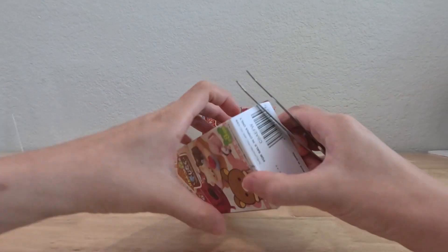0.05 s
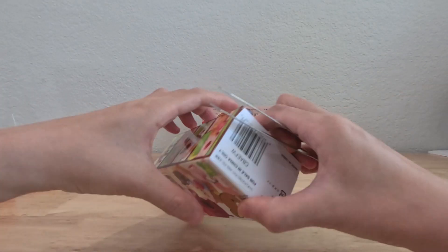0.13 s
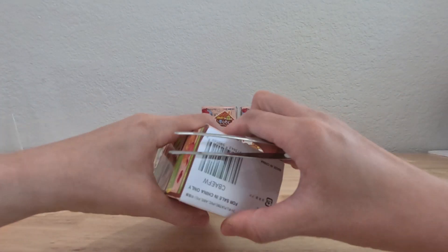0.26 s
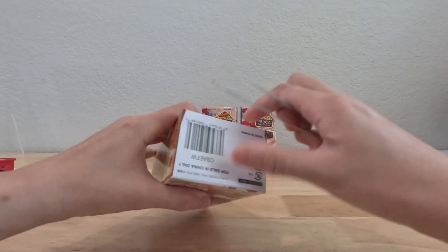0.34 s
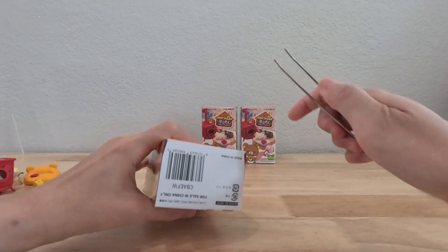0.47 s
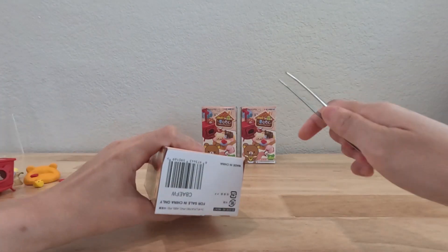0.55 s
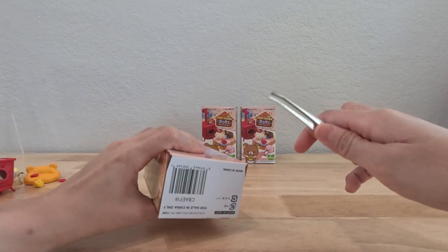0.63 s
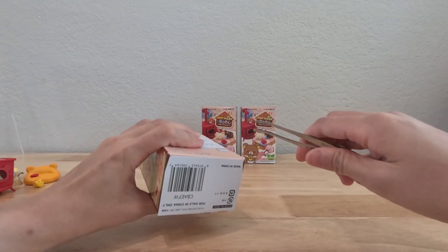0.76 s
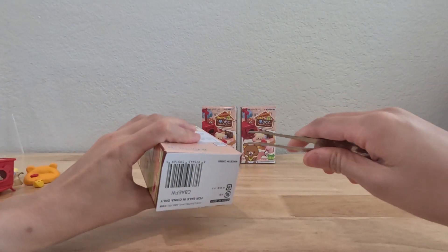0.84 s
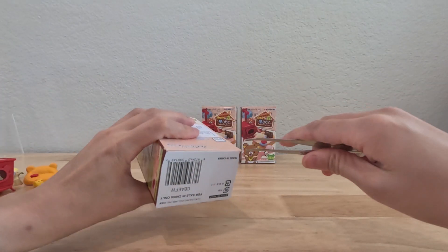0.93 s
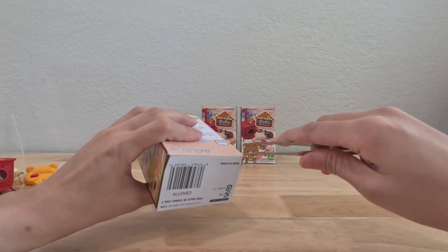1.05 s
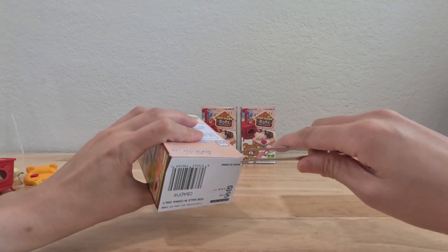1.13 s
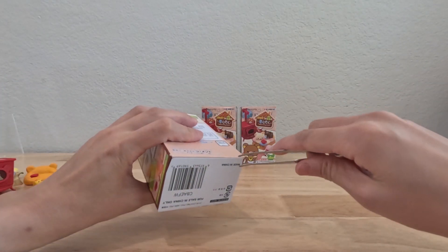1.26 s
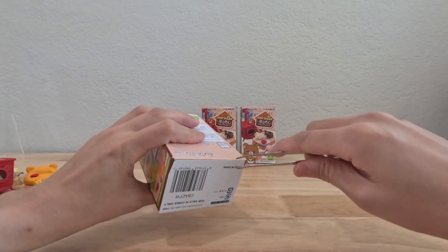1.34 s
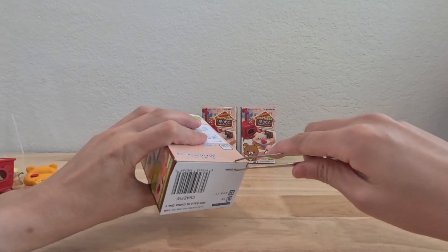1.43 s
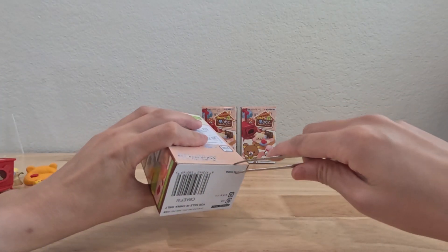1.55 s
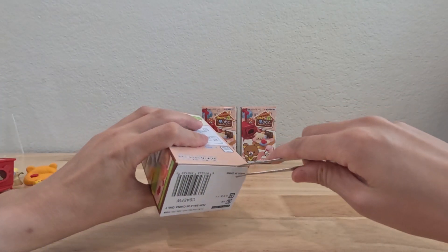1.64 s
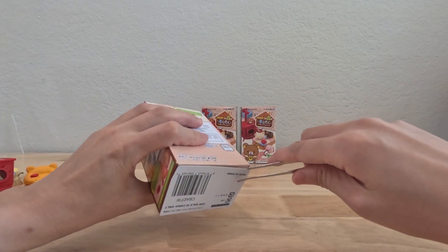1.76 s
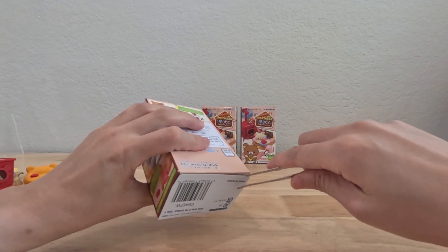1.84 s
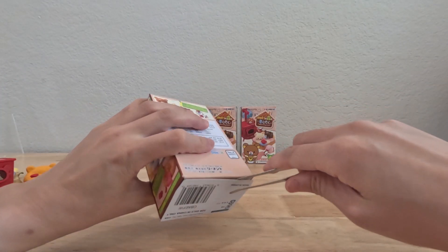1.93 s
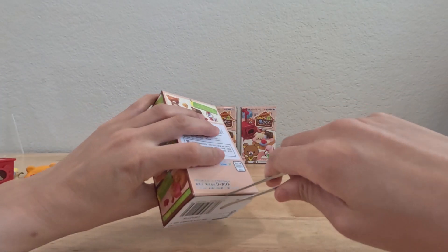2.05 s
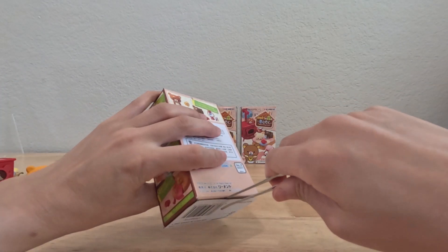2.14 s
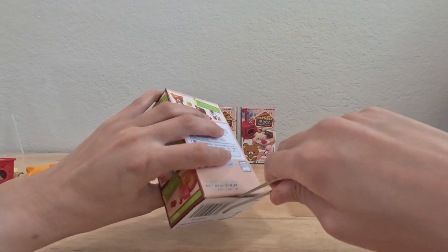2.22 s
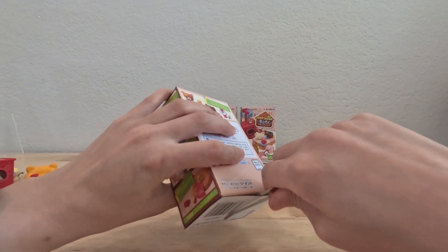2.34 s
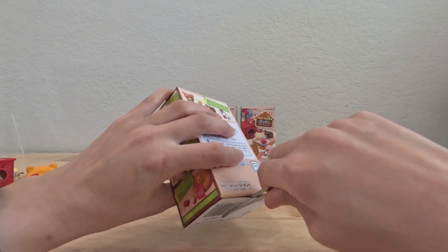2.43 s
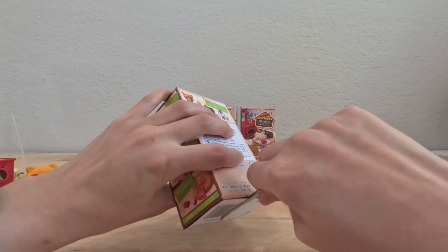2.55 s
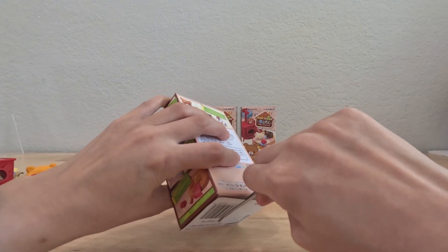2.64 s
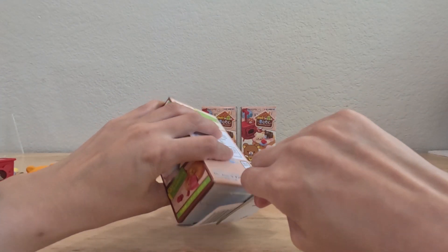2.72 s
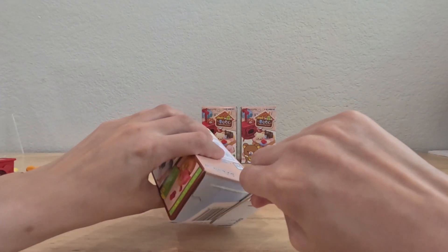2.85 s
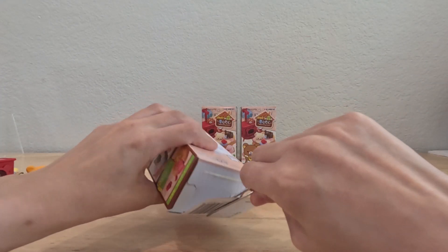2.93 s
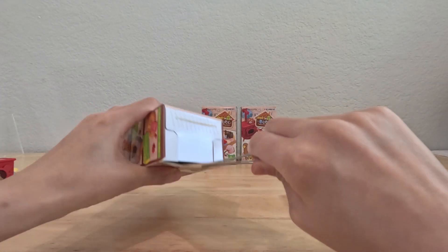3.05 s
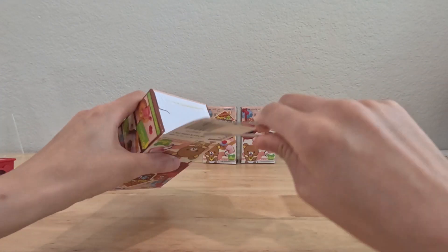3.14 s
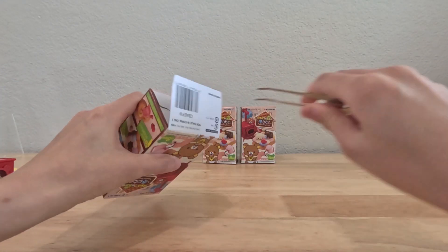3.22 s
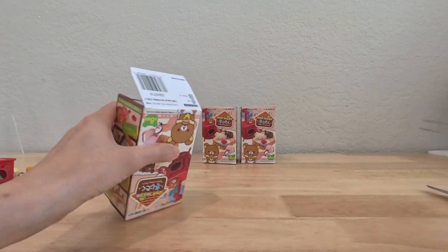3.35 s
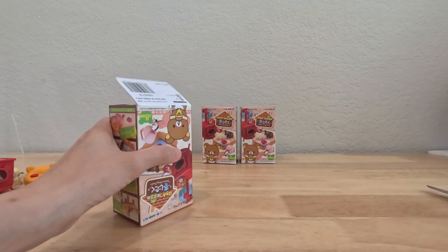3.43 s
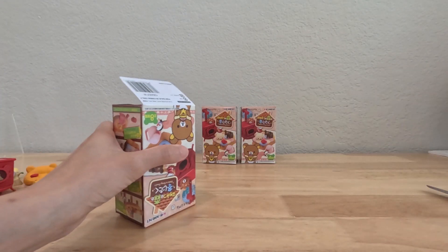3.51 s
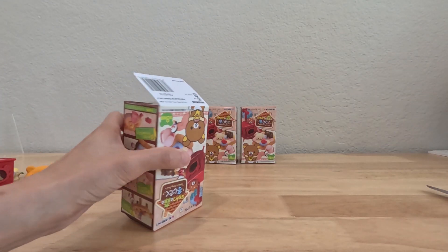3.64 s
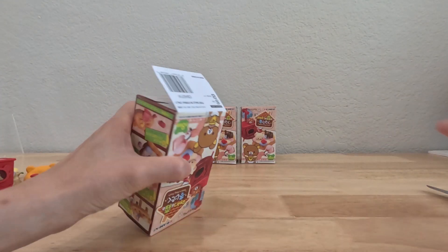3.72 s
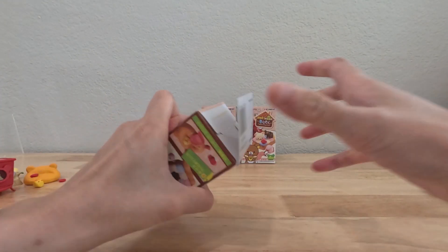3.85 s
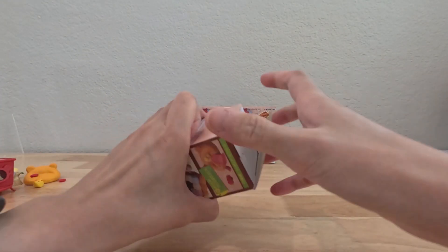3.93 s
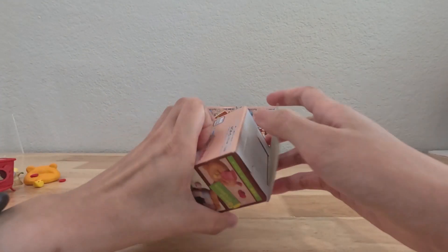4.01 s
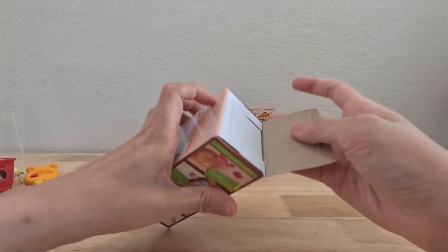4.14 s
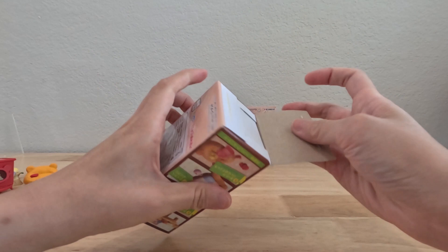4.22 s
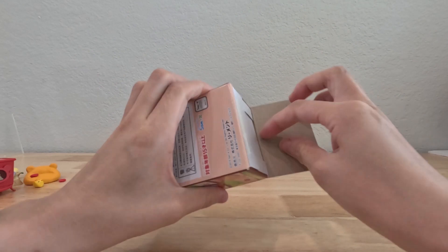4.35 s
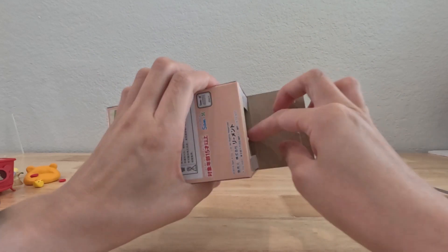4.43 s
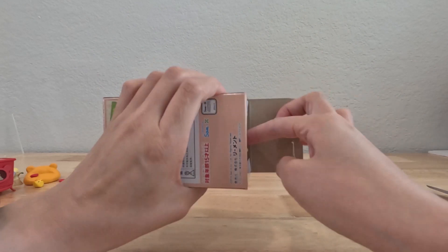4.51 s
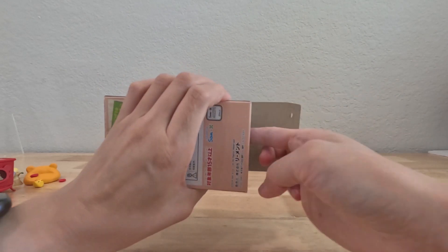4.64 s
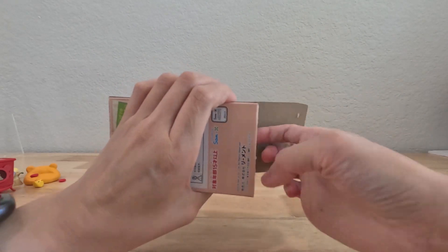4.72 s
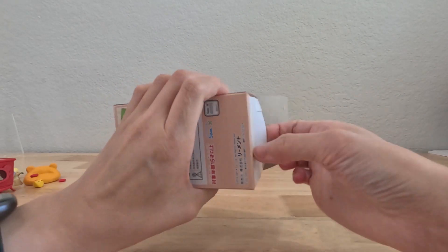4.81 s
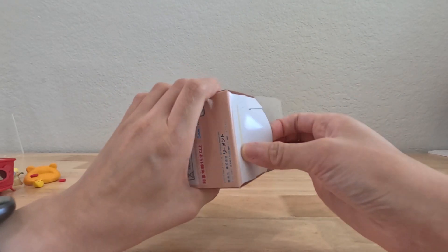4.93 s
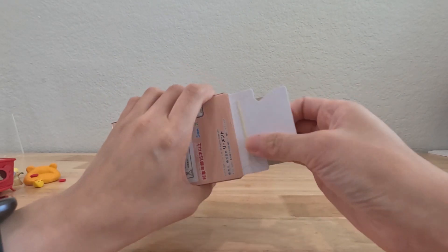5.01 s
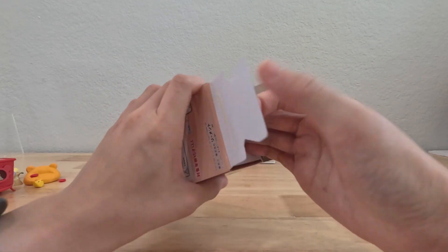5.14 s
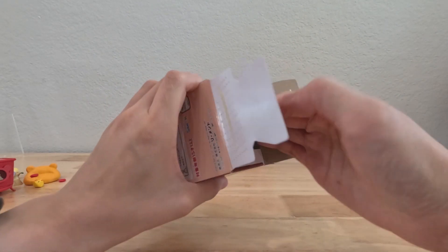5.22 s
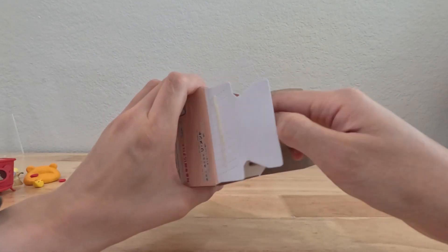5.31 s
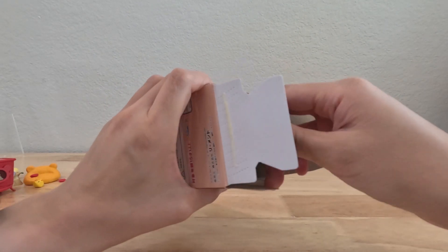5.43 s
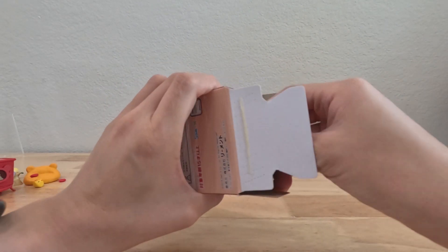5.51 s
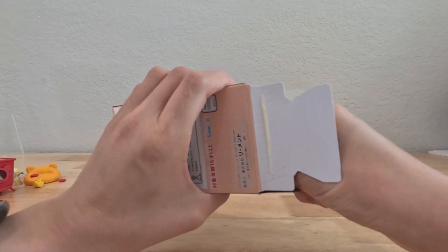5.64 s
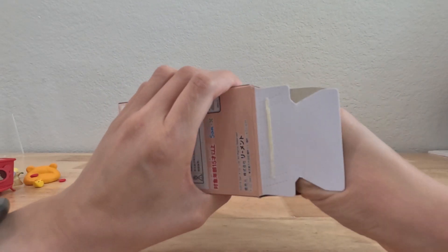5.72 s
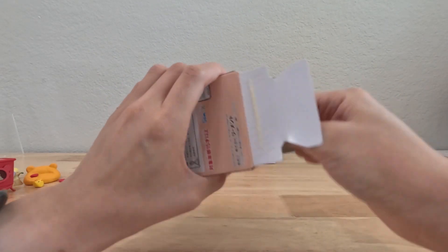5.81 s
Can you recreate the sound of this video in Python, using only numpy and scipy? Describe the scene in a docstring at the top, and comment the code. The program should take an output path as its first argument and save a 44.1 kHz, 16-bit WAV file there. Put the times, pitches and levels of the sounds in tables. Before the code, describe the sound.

Close up, a small card box is prised open with snaps, scrapes and flap crackles, while dropped metal tweezers clatter and ring on a wooden table.

```python
"""Prising open a cardboard toy box

Hands work a small card box open with steel tweezers, close up over a wooden table. Snaps strike the box's
ringing modes; scrapes are streams of tiny slips through the same modes. The dropped tweezers bounce and
chatter on table resonances while their arms ring. A small room adds a diffuse tail over still air and a
low hum, and the hardest snaps clip."""
import sys
import numpy as np
from scipy import signal
from scipy.fft import rfft, irfft, next_fast_len
from scipy.io import wavfile

SR = 44100
rng = np.random.default_rng(int(sys.argv[2]) if len(sys.argv) > 2 else 0)


def store_wav(level_fs):
    """Save 16-bit WAV to argv[1]."""
    pcm = np.round(np.clip(np.atleast_2d(level_fs), -1, 1) * 32767)
    wavfile.write(sys.argv[1], SR, pcm.T.astype(np.int16))


N = 258867
TIME = np.arange(N) / SR


def undb(db):
    """Decibels to gain."""
    return 10 ** (np.asarray(db) / 20)


def unit(x):
    """Scale to rms 1."""
    return x / np.sqrt(np.mean(x ** 2))


def struck(x):
    """Scale a blow to rms 1 over its first hundredth of a second."""
    return x / np.sqrt(np.mean(x[:SR // 100] ** 2))


def span(seconds):
    """Time axis of a short sound."""
    return np.arange(int(seconds * SR)) / SR


def band(x, lo_hz, hi_hz, order=3):
    """Causal band-pass."""
    edges = [lo_hz, min(hi_hz, SR / 2 - 1)]
    sos = signal.butter(order, edges, "band", fs=SR, output="sos")
    return signal.sosfilt(sos, x + 1e-18)


def colour(x, points):
    """Shape a sound by (frequency [Hz], level [dB]) points, joined over log frequency."""
    hz, db = np.transpose(points)
    bins_hz = np.fft.rfftfreq(len(x), 1 / SR)
    gain = undb(np.interp(np.log(bins_hz + 1), np.log(hz), db))
    return irfft(rfft(x) * gain, len(x))


def ring(x, response):
    """Pass a force through a response."""
    return signal.fftconvolve(x, response)[:len(x)]


def add(track, s, sound):
    """Mix a sound in at a time."""
    i = max(int(s * SR), 0)
    track[i:i + len(sound)] += sound[:N - i]


def walk(rate):
    """Smooth chance with a spread near 1, taking so many new values a second."""
    knots = rng.standard_normal(N)
    return 1.2 * np.interp(TIME * rate, np.arange(N), knots)


def clicks(rate, spread_db):
    """Random clicks of uneven size and sign, so many a second."""
    size = undb(spread_db * np.minimum(rng.standard_normal(N), 2))
    return (rng.random(N) < rate / SR) * size * rng.choice([-1, 1], N)


def contact(t, grit, grit_s):
    """One click followed by a short crumble."""
    force = grit * rng.standard_normal(len(t)) * np.exp(-t / grit_s)
    force[0] += 1
    return force


# taps and snaps on the box; the pitch against PANEL_HZ tells how far the grip shifts the main panel modes:
# (time [s], panel pitch [Hz], hollow level [dB], panel level [dB], crack level [dB])
BLOWS = [(0.042, 856, -34, -16, -27.5), (0.153, 800, -53, -31, -43), (0.247, 830, -31, -31, -28.5),
         (0.368, 800, -39, -28, -39), (0.408, 800, -35, -26.5, -43), (0.42, 880, -18.5, -17.5, -20.5),
         (0.571, 830, -34.5, -43, -44.5), (0.943, 970, -52.5, -54, -55.5), (1.015, 950, -54, -52, -60),
         (1.157, 900, -53, -50, -55), (1.322, 1050, -52, -37.5, -37.5), (1.344, 800, -56, -41.5, -36),
         (1.583, 925, -43, -36, -48), (1.711, 892, -35, -26.5, -33), (1.726, 950, -44, -38, -37.5),
         (1.769, 830, -51, -36, -47), (1.911, 940, -35, -21, -34), (2.258, 920, -49, -47.5, -52),
         (2.307, 684, -52, -43, -50), (2.359, 990, -41, -31, -27), (2.389, 1090, -34, -23.5, -31),
         (2.403, 790, -29, -19.5, -35), (2.426, 930, -26, -22, -22.5), (2.483, 840, -31, -26, -27),
         (2.494, 940, -24.5, -8.5, -12), (2.701, 666, -40, -39, -64), (2.721, 734, -41, -30, -48),
         (2.737, 664, -36, -28.5, -61), (2.759, 704, -26.5, -28, -55), (2.787, 1030, -26.5, -32.5, -14.5),
         (2.858, 927, -12.5, -10.5, -10), (2.987, 960, -30, -41, -44.5), (3.116, 1000, -48, -36, -40),
         (3.228, 976, -31.5, -17, -21), (3.257, 1020, -39, -24.5, -30.5), (3.33, 920, -36, -22, -35),
         (3.343, 1000, -40, -28, -33.5), (3.401, 960, -35, -34, -43), (3.523, 914, -28, -24, -32),
         (4.168, 470, -16, -14.5, -30), (4.535, 886, -35, -20.5, -26), (4.567, 940, -36, -31.5, -22.5),
         (4.638, 703, -17.5, -14, -28), (4.767, 747, -23.5, -24.5, -51), (4.787, 754, -41, -24.5, -59),
         (4.856, 1040, -39, -34, -32), (4.905, 1090, -42, -26.5, -26), (4.925, 764, -29.5, -25.5, -31),
         (5.023, 915, -39, -23.5, -27.5), (5.106, 764, -10, -2, -7.5), (5.119, 900, -13, -8, -14),
         (5.401, 1020, -27, -24.5, -30.5), (5.442, 1030, -27.5, -15.5, -22), (5.591, 912, -23, -9, -14.5),
         (5.681, 1010, -19.5, -6, -35), (5.686, 870, -25, -7.5, -31), (5.693, 825, -23, -11, -13.5),
         (5.83, 887, -27, -16, -18)]
PANEL_HZ = 898
# the harder the contact (crack over panel), the more of a bright tick it adds to the crack
TICK_DB, TICK_PER_HARDNESS = -15, 1.3


def box_blows(crack_s=0.0028, tick_s=0.00063, lag_s=0.0017):
    """Each snap cracks the fibres, then rings the panels and the hollow."""
    out, t = np.zeros(N), span(.1)
    for s, hz, hollow, panel, crack in BLOWS:
        force = contact(t, grit=0.19, grit_s=0.0025)
        body = ring(force, box_response(hz / PANEL_HZ, scatter_db=4.0))
        fibres = rng.standard_normal(len(t))
        tearing = band(fibres * np.exp(-t / crack_s), 1700, 6730, order=2)
        snap = struck(band(body, 1436, 5180)) + 0.65 * struck(tearing)
        tick = band(fibres * np.exp(-t / tick_s), 4770, 8200, order=2)
        tick_db = crack + TICK_DB + TICK_PER_HARDNESS * (crack - panel)
        add(out, s, undb(tick_db) * struck(tick))
        add(out, s, undb(crack) * struck(snap))
        add(out, s, undb(panel) * struck(band(body, 429, 1640)))
        # low bending waves cross the card more slowly
        add(out, s + lag_s, undb(hollow) * struck(band(body, 103, 418, order=2)))
    return out


# modes of the held box, before detuning and scatter: (frequency [Hz], t60 [s], level [dB])
BOX = [(171, 0.017, -13), (277, 0.033, -7.5), (382, 0.14, -23), (507, 0.022, -4), (744, 0.049, -10),
       (908, 0.034, 7.5), (1055, 0.018, 6), (1413, 0.0052, 7), (1876, 0.035, -8), (2380, 0.054, -20.5),
       (2966, 0.016, -10), (3840, 0.0065, -5.5), (4760, 0.022, -14.5), (7000, 0.018, -40),
       (7450, 0.0028, 0.5)]


def box_response(stretch, scatter_db):
    """The box rings; grip shifts the main panel modes and the place of contact weights them all."""
    t = span(.1)
    hz, t60, db = np.transpose(BOX)[:, :, None]
    detune, weight = rng.standard_normal((2, len(BOX), 1))
    gripped = (hz > 620) & (hz < 1200)
    hz = hz * np.where(gripped, stretch, 1) * (1 + 0.052 * detune)
    fade = undb(db + scatter_db * weight - 60 * t / t60)
    return np.sum(fade * np.sin(2 * np.pi * hz * t), axis=0)


# soft bumps of hand, box and table, before their rounded envelope: (time [s], frequency [Hz], level [dB])
BUMPS = [(.002, 80, -14.5), (0.573, 183, -17), (2.767, 69, -17), (2.786, 73.4, -8), (2.861, 154, 2.5),
         (3.472, 144, -19), (3.522, 162, -21), (3.679, 118, -11), (4.645, 107, -15), (4.879, 144, -7.5),
         (4.93, 124, -6), (5.123, 170, -3), (5.135, 120, -11.5)]
# each knock of the tweezers also thumps the table; level against the knock
THUMP_HZ, THUMP_DB = 121, -2.5


def bumps(decay_s=0.0032, rise_s=0.0027):
    """Soft pushes that swing for only a cycle or two."""
    out, t = np.zeros(N), span(.08)
    envelope = np.exp(-t / decay_s) * (1 - np.exp(-t / rise_s))
    thumps = [(s, THUMP_HZ, knock + THUMP_DB) for s, knock in DROPS]
    for s, hz, db in list(BUMPS) + thumps:
        add(out, s, undb(db) * 2 * np.sin(2 * np.pi * hz * t) * envelope)
    return out


# how far the box stands open: (time [s], share [0-1])
OPEN = [(2.8, 0), (4.4, 0.3), (5.1, 0.9)]
# spectrum of the card's hiss: (frequency [Hz], level [dB])
FIBRE = [(880, -76), (1500, 1), (1810, 1.5), (2190, -18), (3120, -2), (4120, -2.5), (6310, -7),
         (7390, -6.5), (9010, -17), (10000, -10.5), (11400, -26), (14200, -29), (16000, -60)]
# the hands rumble under the rubbing; level against the hollow
RUMBLE_DB = -8


def rubbing(hollow_db=-1):
    """Steel slides on the shut box with a broad hiss; open flaps crackle more and ring the panels."""
    hollow, panel, hiss = friction()
    opened = np.clip(np.interp(TIME, *np.transpose(OPEN)), 0, 1)
    # the edge catches and lets go in dense tiny slips
    slips = unit(clicks(rate=3000, spread_db=4.5) * undb(3 * walk(110)))
    # loose flaps also give now and then in larger jerks
    jerks = unit(clicks(rate=160, spread_db=3))
    slips = unit(slips + .55 * opened * jerks)

    # the contact wanders between places that ring differently
    places = np.array([undb(7 * walk(14)) for _ in range(3)])
    places /= np.linalg.norm(places, axis=0)
    responses = [box_response(stretch, scatter_db=2) for stretch in (.88, 1, 1.15)]
    body = sum(share * unit(ring(slips, response)) for share, response in zip(places, responses))

    open_ring = unit(band(body, 647, 1750))
    shut_scrape = unit(band(slips, 464, 1490, order=2))
    middle = np.sqrt(opened) * open_ring + np.sqrt(1 - opened) * shut_scrape

    grain = unit(colour(slips + .35 * rng.standard_normal(N), FIBRE))
    # share of the hiss that comes as separate crackles
    loose = .15 + .3 * opened
    crackling = unit(crackle() + 0.5 * unit(band(body, 1690, 6500)))
    edge = np.sqrt(1 - loose) * grain + np.sqrt(loose) * crackling

    low = unit(band(body + 0.68 * unit(band(slips, 138, 610)), 97, 520, order=2))
    low += undb(RUMBLE_DB) * unit(band(rng.standard_normal(N), 38, 152, order=2))
    return hollow * undb(hollow_db) * low + panel * middle + hiss * flexing(edge)


# scrapes of tweezers, fingers and flaps along the card, before the trim of the hollow in rubbing():
# (time [s], length [s], hollow level [dB], panel level [dB], hiss level [dB])
STROKES = [(0.0, 0.024, -25, -27.5, -30), (0.053, 0.061, -38, -36.5, -41), (0.343, .08, -34.5, -38, -37),
           (0.56, 0.081, -41, -53.5, -58.5), (0.691, 0.072, -53, -58, -56.5),
           (1.22, 0.18, -58.5, -51.5, -52.5), (1.823, 0.05, -52, -39, -41.5), (1.884, 0.04, -37, -35, -46),
           (1.988, 0.17, -37.5, -31.5, -36.5), (2.348, 0.046, -33, -28.5, -25),
           (2.518, 0.088, -49, -38, -43.5), (2.802, 0.075, -38, -46, -38), (2.865, 0.073, -33, -29.5, -36),
           (3.018, 0.021, -36, -35.5, -37), (3.242, 0.065, -47, -34, -34.5),
           (3.318, 0.019, -30.5, -23, -27), (3.481, 0.1, -39.5, -38.5, -38), (3.679, 0.058, -32, -41, -39),
           (4.187, 0.069, -30, -33.5, -33.5), (4.406, 0.11, -43.5, -39, -33.5),
           (4.505, .12, -33, -28.5, -30), (4.674, 0.056, -26.5, -29, -31.5),
           (4.761, 0.18, -33.5, -35, -35.5), (5.072, 0.031, -25, -21, -31), (5.197, 0.051, -40, -19, -26.5),
           (5.335, 0.032, -35.5, -30, -34.5), (5.441, 0.05, -28.5, -19.5, -23.5),
           (5.676, 0.14, -30.5, -21, -26.5)]
# every scrape bites over a share of its length, presses a little harder as it goes and lets go
BITE_SHARE, PRESS_DB, RELEASE_DB_PER_S = 0.34, 1, 410
# the fingers shift on the box all along, least while it is held still for prising: (time [s], level [dB])
HANDLING = [(0, -34), (0.3, -47), (0.52, -44.5), (0.8, -68), (1.15, -63.5), (1.65, -69.5), (1.8, -60),
            (2.0, -51), (2.25, -65), (2.68, -57.5), (2.97, -37.5), (3.17, -50), (3.36, -53), (3.45, -44.5),
            (4.2, -40), (5.0, -36), (5.6, -32), (5.87, -30.5)]
# colour of that handling, added to its level: (hollow [dB], panel [dB], hiss [dB])
HANDLING_DB = (-9.5, -0.5, -1.5)
# before a snap the card creeps under the growing load: level against the blow, and how fast it builds
CREEP_DB, CREEP_RISE_DB_PER_S = -13, 900
# after a blow the card slides on a little: level against the blow (hollow [dB], panel [dB], hiss [dB])
SLIDE_DB, SLIDE_FADE_DB_PER_S = (-10.5, -14, -15.5), 276


def friction(lead_s=.04):
    """Rubbing strength in hollow, panels and hiss: handling, scrapes, and creep and slide around blows."""
    t = span(.4)
    moves = []
    for s, length, *levels in STROKES:
        bite = np.minimum(t / (BITE_SHARE * length), 1)
        press = PRESS_DB * (np.minimum(t / length, 1) - .5)
        release = RELEASE_DB_PER_S * np.maximum(t - length, 0)
        moves.append((s, levels, bite * undb(press - release)))
    creep = undb(CREEP_RISE_DB_PER_S * (span(lead_s) - lead_s))
    slide = undb(-SLIDE_FADE_DB_PER_S * t)
    for s, _, *levels in BLOWS:
        moves.append((s - lead_s, np.add(levels, CREEP_DB), creep))
        moves.append((s, np.add(levels, SLIDE_DB), slide))
    handling_db = np.interp(TIME, *np.transpose(HANDLING))
    power = undb(np.add.outer(HANDLING_DB, handling_db)) ** 2
    for s, levels, envelope in moves:
        for track, db in zip(power, levels):
            add(track, s, (undb(db) * envelope) ** 2)
    return np.sqrt(power)


def crackle(rate=520):
    """Fibres let go one by one, each a few cycles long at its own pitch."""
    out, t = np.zeros(N), span(.012)
    for when, pitch, size in rng.random((int(rate * N / SR), 3)):
        hz = 2000 * 4 ** pitch
        # many small releases, few large ones
        db = -4 * np.log(max(1 - size, .06))
        add(out, when * N / SR, undb(db) * np.sin(2 * np.pi * hz * t) * np.exp(-hz * t / 2))
    return unit(band(out, 1340, 6400))


def flexing(x, count=18, depth_db=3.8, rate=24):
    """As the card bends, now one narrow range of its treble stands out, now another."""
    size = next_fast_len(N, real=True)
    log_hz = np.log(np.fft.rfftfreq(size, 1 / SR) + 1)
    place = np.interp(log_hz, np.log([1200, 11000]), [0, count - 1])
    spectrum = rfft(x, size)
    # overlapping triangular ranges that add up to the whole
    ranges = (irfft(spectrum * np.maximum(1 - abs(place - k), 0), size)[:N] for k in range(count))
    return unit(sum(part * undb(depth_db * walk(rate)) for part in ranges))


# tweezers landing on the table: (time [s], knock level [dB])
DROPS = [(3.673, -19), (3.7662, -7), (3.795, -12), (3.8162, -9), (3.835, -17), (3.858, -13.5),
         (3.880, -14.5), (3.902, -21)]
# resonances of the table top under steel, each also weighted by its width:
# (frequency [Hz], width [Hz], level [dB])
TABLE = [(217, 580, -2.5), (726, 440, -3), (1290, 180, 3.5), (1730, 310, 0.5), (2430, 97, -0.5),
         (2626, 39, 2), (2830, 340, -2.5), (3284, 160, 0), (3920, 920, -5.5), (5260, 1800, -15.5),
         (7240, 1400, -34)]
# modes of the free steel arms, before damping by the table: (frequency [Hz], level [dB], t60 [s])
STEEL = [(7149, -17, .44), (8934, -18, .3), (9253, -3, .23), (9503, -4, .2), (10009, 0, .2),
         (10490, -13, .22), (11285, -14, .17), (11889, -8, .2), (12110, -6, .2), (12718, -23, .25),
         (13311, -25, .2), (13518, -27, .22), (13990, -19, .17), (14700, -27, .18), (15430, -29, .25)]
# the tweezers at first touch, still held at one end: (frequency [Hz], level [dB])
HELD = [(1210, -26), (1485, -26), (2860, -48), (3340, -35), (4500, -29), (6850, -26)]
HELD_T60_S = .06
# the arms ring ever louder until they are free of the fingers
FREE_S, FREE_RING_DB, FREEING_DB_PER_S = 3.875, -18, 237


def tweezers(buzz_db=-6, damping=1.8):
    """The tweezers bounce and chatter on the wood; once free of the fingers their arms ring."""
    t = span(.45)
    wood = np.zeros(len(t))
    for k, (hz, width, db) in enumerate(TABLE):
        # neighbouring resonances swing in opposite directions
        mode = np.exp(-np.pi * width * t) * np.sin(2 * np.pi * hz * t) * (-1) ** k
        wood += undb(db) * width * mode
    wood = band(wood, 85, 9500)

    hz, db, t60 = np.transpose(STEEL)[:, :, None]
    # touching the table shortens the ring
    fade = undb(db - 60 * damping * t / t60)
    arms = fade * np.exp(2j * np.pi * hz * t) * (1 - np.exp(-t / .0005))

    out = np.zeros(N)
    # the tips skid on first touch, which keeps the held arms sounding roughly
    held = sum(undb(db - 60 * t / HELD_T60_S) * np.sin(2 * np.pi * hz * t) for hz, db in HELD)
    skid = contact(t, grit=.04, grit_s=.07)
    add(out, DROPS[0][0], ring(skid, held))

    for s, knock in DROPS:
        force = contact(t, grit=0.14, grit_s=0.0066)
        tap = struck(ring(force, wood)) + 0.3 * struck(band(force, 4200, 7500))
        add(out, s, undb(knock) * struck(tap))
        # each bounce meets the arms at another place and another point of their swing
        phase = np.exp(2j * np.pi * rng.random((len(STEEL), 1)))
        swing = phase * undb(3 * rng.standard_normal((len(STEEL), 1)))
        steel_db = FREE_RING_DB - FREEING_DB_PER_S * max(FREE_S - s, 0)
        ringing = np.sum(arms * swing * touched(t, STEEL), axis=0).imag
        add(out, s, undb(steel_db) * struck(ringing))

    taps = chatter()
    metal = np.sum(arms, axis=0).imag
    # the buzz of the arms frees up half as steeply as their ring
    freed = undb(-FREEING_DB_PER_S * np.maximum(FREE_S - TIME, 0) / 2)
    buzz = undb(buzz_db) * ring(taps * freed, metal / np.linalg.norm(metal))
    rattle = ring(taps, wood / np.linalg.norm(wood))
    return out + buzz + rattle + 0.5 * band(taps, 3100, 8400)


# the tweezers chatter through the later bounces and past the last one: it builds up, peaks and dies away
CHATTER_START_S, CHATTER_PEAK_S, CHATTER_END_S = 3.77, 3.9075, 4.05
CHATTER_DB, CHATTER_RISE_DB_PER_S, CHATTER_FALL_DB_PER_S = -15.5, 61, 254


def chatter():
    """The two ends rock against the wood in uneven taps that tend to quicken, swell and die away."""
    taps_per_s = np.interp(TIME, [CHATTER_START_S, CHATTER_END_S], [170, 480]) * undb(3.3 * walk(300))
    taps = np.diff(np.floor(np.cumsum(taps_per_s) / SR), prepend=0)
    taps = unit(taps * undb(2.3 * rng.standard_normal(N)))
    late = TIME - CHATTER_PEAK_S
    db = CHATTER_DB + np.minimum(CHATTER_RISE_DB_PER_S * late, -CHATTER_FALL_DB_PER_S * late)
    return taps * undb(db) * (TIME > CHATTER_START_S) * (TIME < CHATTER_END_S)


def touched(t, modes, depth_db=4, rate=50):
    """Glancing touches damp each steel mode now more, now less."""
    knots = np.arange(int(t[-1] * rate) + 2)
    sway = [np.interp(t * rate, knots, rng.standard_normal(len(knots))) for _ in modes]
    return undb(depth_db * np.array(sway))


def ports(x, spread=.22):
    """Two close microphones: the right hears it a hair sooner, and the table scatters sound between them."""
    t = span(.012)
    paths = rng.standard_normal(len(t)) * np.exp(-t / .005) * (t > .001)
    scattered = ring(x, paths / np.linalg.norm(paths))
    side = spread * band(scattered, 500, 6000, order=1)
    delay_s = 1e-5
    late = irfft(rfft(x) * np.exp(-2j * np.pi * np.fft.rfftfreq(N, 1 / SR) * delay_s), N)
    return np.array([late + side, x - side])


ROOM_DB, ROOM_T60_LOW_S, ROOM_T60_HIGH_S = -17, 0.37, 0.42


def room(x, wet_db, width=0.64):
    """Walls return a diffuse tail; its bass is more alike at both microphones than its treble."""
    t = span(.6)
    mid, side = rng.standard_normal((2, len(t)))
    tails = []
    for sign in (1, -1):
        low = band(mid + sign * .5 * side, 270, 930, order=2) * undb(-60 * t / ROOM_T60_LOW_S)
        high = band(mid + sign * width * side, 1320, 8000, order=2) * undb(-60 * t / ROOM_T60_HIGH_S)
        # the tail swells in softly after the direct sound
        tail = (1.7 * low + high) * (1 - np.exp(-(t / 0.017) ** 2))
        tails.append(ring(x, tail / np.sqrt(np.sum(tail ** 2) * 2)))
    return undb(wet_db) * np.array(tails)


# spectrum of the still air: (frequency [Hz], level [dB])
AIR = [(12, -37), (20, 14.5), (65, -10), (83, 0), (109, -4.5), (229, -13), (278, -17.5), (766, -29),
       (1010, -22), (2290, -65), (6860, -34.5), (10400, -47), (14000, -79)]
AIR_DB, HUM_HZ, HUM_DB = -47.5, 60.6, -44


def background():
    """Still room air as shaped noise, partly shared by both sides, and a slightly wavering low hum."""
    mid, left, right = (unit(colour(rng.standard_normal(N), AIR)) for _ in range(3))
    waver_hz, waver_db = walk(10), 1.3 * walk(7)
    phase = 2 * np.pi * np.cumsum(HUM_HZ + waver_hz) / SR
    hum = np.sqrt(2) * np.sin(phase) * undb(HUM_DB + waver_db)
    return undb(AIR_DB) * (mid + 0.64 * np.array([left, right])) + hum


def scene():
    """The box is near; the tweezers land further off, deeper in the room."""
    box = box_blows() + bumps() + rubbing()
    steel = tweezers()
    near = ports(box) + room(box, ROOM_DB)
    far = ports(steel) + room(steel, wet_db=-7.0)
    return near + far + background()


TOP_HZ = 16000


def record(dry):
    """The right microphone is a little hotter; the hardest snaps clip at full scale; the top is cut."""
    sensitivity = undb([[-.55], [.55]])
    cut = signal.ellip(8, .2, 70, TOP_HZ, fs=SR, output="sos")
    return signal.sosfilt(cut, np.clip(dry * sensitivity, -1, 1))


dry = scene()
out = record(dry)
store_wav(out)
```